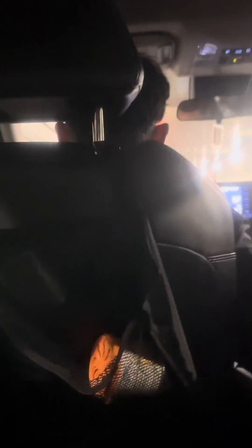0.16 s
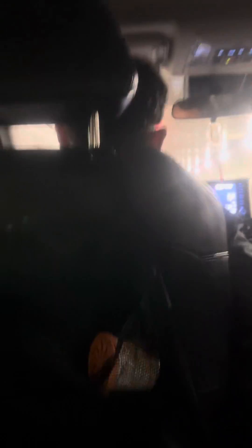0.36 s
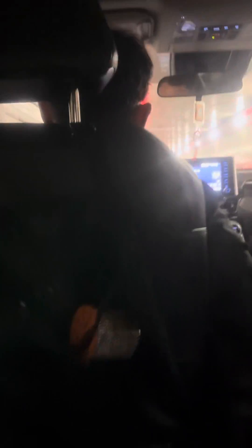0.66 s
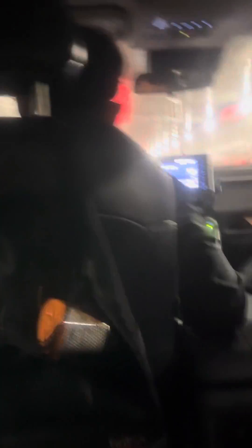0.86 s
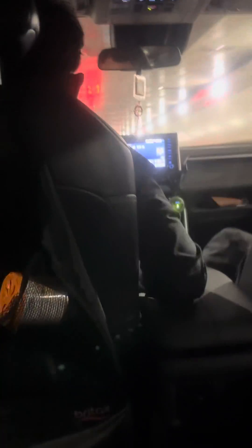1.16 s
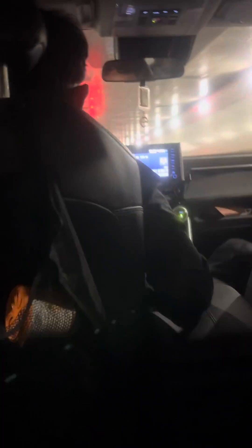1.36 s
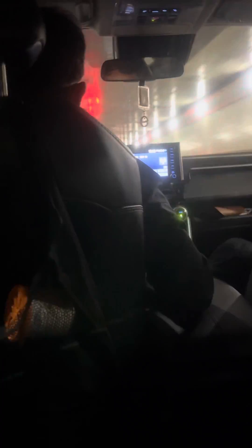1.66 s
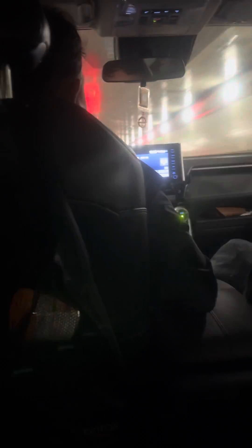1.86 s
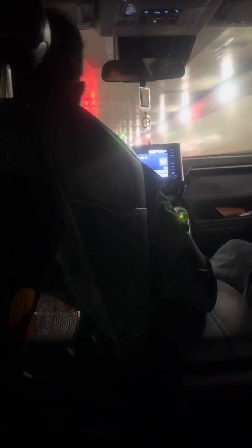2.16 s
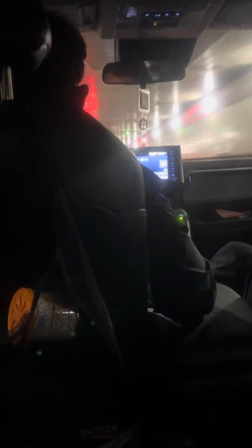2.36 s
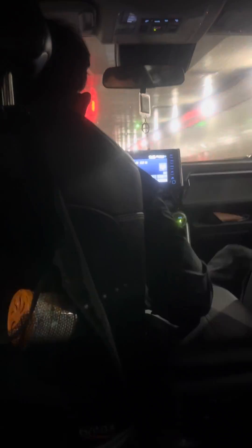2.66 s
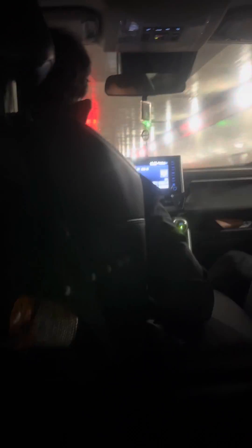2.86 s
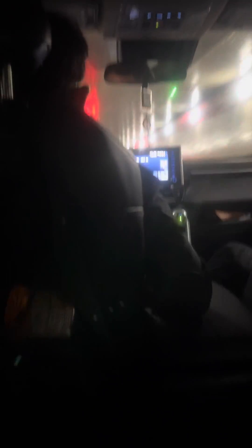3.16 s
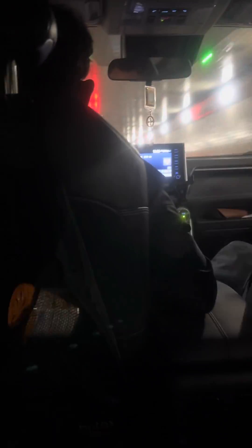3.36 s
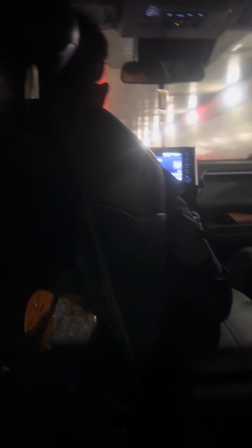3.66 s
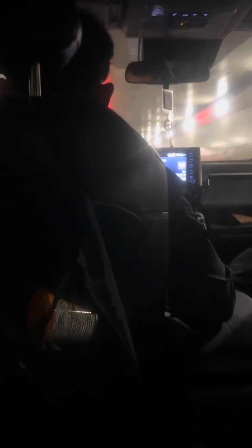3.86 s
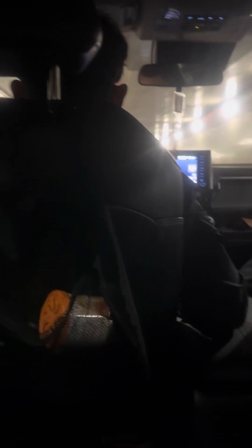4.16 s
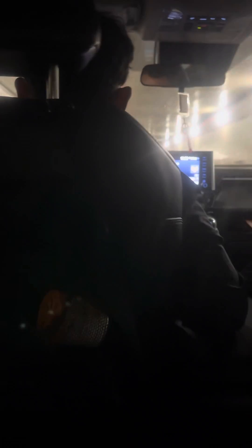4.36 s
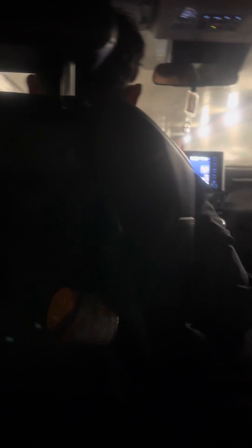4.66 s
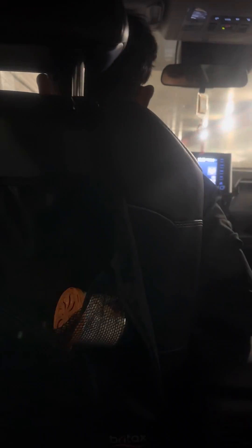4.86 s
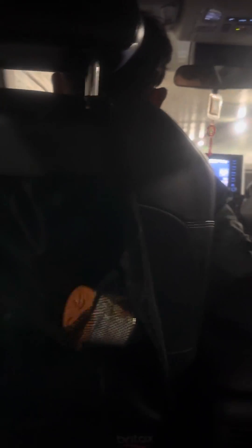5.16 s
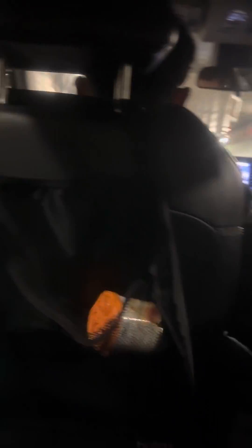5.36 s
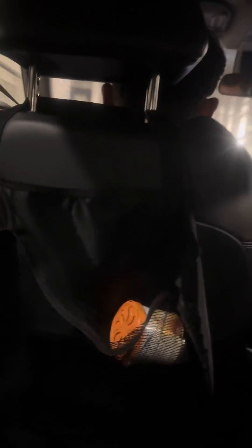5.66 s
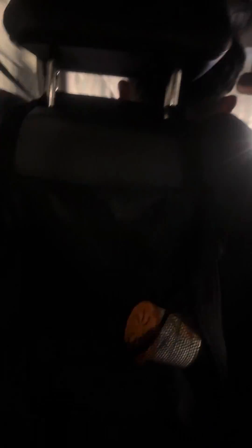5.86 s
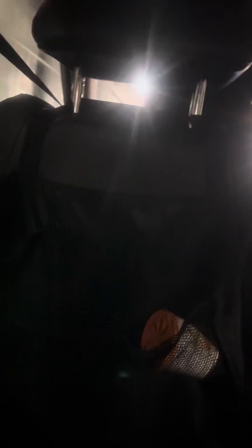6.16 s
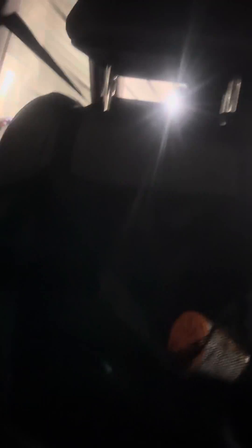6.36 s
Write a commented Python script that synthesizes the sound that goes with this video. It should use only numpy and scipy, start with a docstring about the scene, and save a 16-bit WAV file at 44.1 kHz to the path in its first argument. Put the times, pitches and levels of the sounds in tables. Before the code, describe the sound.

Heard from a car's back seat, heavy low rumble and engine hum continue, with a brief sleeve rustle, dull jolts and one plastic click.

```python
"""Inside a car driving through a tunnel, heard from the back seat.
From the start the road shakes the body into a deep rumble, tyres roar in brief swells and air hisses outside.
The engine drones, sags while coasting and later climbs under load; the wheels add a boom and a drone.
Early on a sleeve brushes the seat: shaped noise with bright ticks. Bumps then ring modes of the body,
and a piece of plastic trim clicks: a quick run of contacts that rings its own modes."""
import sys
import numpy as np
from scipy import signal
from scipy.fft import rfft, irfft
from scipy.io import wavfile
from scipy.ndimage import uniform_filter1d

SR = 44100
rng = np.random.default_rng(int(sys.argv[2]) if len(sys.argv) > 2 else 0)


def store_pcm(level_fs):
    """Save levels as 16-bit WAV."""
    pcm = np.round(np.clip(level_fs, -1, 1) * 32767).astype(np.int16)
    wavfile.write(sys.argv[1], SR, np.atleast_2d(pcm).T)


N = 287091


def from_db(db):
    """Decibels to gain."""
    return 10 ** (np.asarray(db) / 20)


def rms_one(x):
    """Scale to rms 1."""
    return x / np.sqrt(np.mean(x ** 2) + 1e-20)


def in_time(rows):
    """Each column of a curve, drawn as straight lines between its points, at every sample."""
    seconds, *columns = np.transpose(rows)
    t = np.arange(N) / SR
    return [np.interp(t, seconds, column) for column in columns]


def at_hz(points, hz):
    """Read a curve over pitch on a log-frequency axis."""
    known_hz, values = np.transpose(points)
    return np.interp(np.log(hz + 1), np.log(known_hz + 1), values)


def lift_db(resonances, hz):
    """How many dB a set of resonances lifts each frequency."""
    return sum(lift / (1 + (2 * (hz - centre) / width) ** 2) for centre, width, lift in resonances)


def drift(per_s):
    """Slow chance with spread 1: noise that loses strength above per_s wavers a second."""
    hz = np.fft.rfftfreq(N, 1 / SR)
    smooth = rfft(rng.standard_normal(N)) / (1 + (hz / per_s) ** 2)
    return rms_one(irfft(smooth, N))


def cabin_noise(spectrum, resonances=()):
    """A diffuse noise field, left and right: alike in some bands, unlike in others; their mean has rms 1."""
    # How alike both sides are. Each row: pitch in Hz, likeness from 0 to 1.
    likeness_curve = [(45, .9999), (90, .999), (140, .996), (200, .98), (290, .92), (400, .96), (500, .78),
                      (565, .86), (620, .3), (690, .45), (860, .25), (1200, .68), (1600, .93), (1900, .98),
                      (2250, .92), (2600, .56), (3000, .3), (3400, .8), (4000, .8), (4450, .68),
                      (5400, .93), (6300, .85), (8000, .85)]
    # Phase between the sides. Each row: pitch in Hz, radians by which left leads.
    lead_curve = [(600, 0), (1120, .35), (1900, .05), (4800, .2), (5300, -.18), (6000, -.5), (7000, -1.15),
                  (8000, -1.65), (9000, -2.2)]
    # Balance of the field. Each row: pitch in Hz, left minus right in dB.
    balance_curve = [(150, 0), (190, -0.5), (250, -1), (410, -1), (540, 0.5), (770, -1.5), (900, 0),
                     (3000, 0), (5500, 0)]
    hz = np.fft.rfftfreq(N, 1 / SR)
    colour_db = at_hz(spectrum, hz) + lift_db(resonances, hz)
    alike, lead = at_hz(likeness_curve, hz), at_hz(lead_curve, hz)
    mid, side = rfft(rng.standard_normal((2, N)))
    sign = np.array([[1], [-1]])  # left, right
    blend = np.sqrt(1 + alike) * mid + sign * np.sqrt(1 - alike) * side
    sides = blend * np.exp(.5j * sign * lead)
    sides /= np.sqrt(1 + alike * np.cos(lead))  # the spectrum describes the mean of both sides
    side_db = colour_db + sign * at_hz(balance_curve, hz) / 2
    pair = irfft(sides * from_db(side_db), N)
    return pair / pair.mean(axis=0).std()


def steadied(pair, window_s, share):
    """Take a share of the slow swells out of a noise; the mean of both sides keeps rms 1."""
    window = max(int(window_s * SR), 1)
    power = uniform_filter1d(np.mean(pair ** 2, axis=0), window)
    even = pair / power ** (np.clip(share, 0, 1) / 2)
    return even / even.mean(axis=0).std()


def strike(hits, modes, spread_db):
    """Every hit rings every mode as a decaying sine, each time with a slightly different strength."""
    times, hit_db = np.transpose(hits)
    chance_db = spread_db * rng.standard_normal((len(hits), len(modes)))
    strengths = from_db(hit_db[:, None] + chance_db)
    samples = np.round(times * SR).astype(int)
    ringing = np.zeros(N)
    for (hz, mode_db, t60), strength in zip(modes, strengths.T):
        taps = np.full(N, 1e-18)
        taps[samples] = strength * from_db(mode_db)
        decay = from_db(-60 / (t60 * SR))  # per sample
        turn = 2 * np.pi * hz / SR  # radians per sample
        ringing += signal.lfilter([0, np.sin(turn)], [1, -2 * decay * np.cos(turn), decay * decay], taps)
    return ringing


def drone(hz, level_db, orders, flutter_db, wobble):
    """A hum at multiples of its rate, orders = (multiple, dB); the load shakes its level and phase (radians)."""
    angle = 2 * np.pi * np.cumsum(hz) / SR + wobble * drift(2.9)
    tone = sum(from_db(db) * np.sin(k * angle + 2 * np.pi * rng.random()) for k, db in orders)
    return np.sqrt(2) * tone * from_db(level_db + flutter_db * drift(48))


def road_rumble():
    """The surface shakes the body unevenly: deep noise that gets louder with the roughness of the road."""
    # Roughness of the road. Each row: time in seconds, rumble level in dB.
    roughness = [(0, -22.5), (.36, -29), (.48, -23.5), (.74, -24), (.94, -28.5), (1.26, -25.5),
                 (1.48, -24.5), (1.6, -29), (2.2, -25.5), (2.8, -26.5), (3.15, -23), (3.32, -25),
                 (3.44, -28.5), (3.56, -25.5), (4.1, -23), (4.22, -27.5), (4.34, -23.5), (4.5, -24.5),
                 (4.7, -22), (5.04, -25.5), (5.12, -29.5), (5.25, -22), (5.48, -29), (5.7, -22.5),
                 (6.0, -21.5), (6.51, -23)]
    # Colour of the rumble. Each row: pitch in Hz, relative density in dB.
    rumble_spectrum = [(12, -46), (21, -27), (26, -11), (33, -1), (40, -3), (50, 4.5), (60, 4), (78, 8.5),
                       (105, 1.5), (135, 0), (150, -4.5), (166, -14), (210, -22), (330, -64), (9000, -120)]
    level_db, = in_time(roughness)
    return from_db(level_db) * steadied(cabin_noise(rumble_spectrum), window_s=0.11, share=0.46)


def tyres():
    """The low part of the roar follows the road surface; its upper part swells briefly now and then."""
    # Colour of the roar. Each row: pitch in Hz, relative density in dB.
    roar_spectrum = [(100, -17), (180, -0.16), (260, -3.5), (400, -5.5), (520, -8.5), (625, -13),
                     (900, -16.5), (1200, -20), (1700, -26), (2200, -29), (2600, -37.5), (3600, -63),
                     (9000, -100)]
    # Cabin air resonances that colour it. Each row: centre in Hz, width in Hz, lift in dB.
    cabin_air = [(316, 38, 2), (412, 19, 2.5), (551, 11, 4), (578, 24, 4.5), (680, 29, 3.5), (736, 22, 4),
                 (787, 33, 3), (855, 25, 3), (942, 80, 3), (1090, 63, 3), (1302, 49, 4), (1465, 39, 2.5),
                 (1620, 100, 2), (2910, 130, 8.5)]
    # Loudness of the low part. Each row: time in seconds, gain in dB.
    low_roar = [(0, -1), (.3, -1), (.48, 0), (.8, -1.5), (1.22, -1), (1.6, 0), (2.1, -1), (2.38, 2.5),
                (2.85, -1.5), (3.1, 2.7), (3.6, -1), (4.25, 0.7), (4.44, 2.4), (4.65, -1.5), (5.05, 2),
                (5.4, -1), (5.85, -0.5), (6.51, 1.3)]
    # Brief swells of the upper part. Each row: peak time in seconds, lift in dB.
    swells = [(.58, 0.5), (1.24, 0.5), (1.86, 0), (2.75, 1), (3.08, 1), (3.53, 0.5), (3.77, 0.7),
              (4.7, 0.9), (5.33, 1), (6.24, 1.5)]
    roar_db, split_hz = -32.5, 380
    swell_s = .09  # from the peak to 1/e of the lift
    roar = from_db(roar_db) * steadied(cabin_noise(roar_spectrum, cabin_air), window_s=0.57, share=0.21)
    t = np.arange(N) / SR
    low_db, = in_time(low_roar)
    swell_db = sum(db * np.exp(-((t - s) / swell_s) ** 2) for s, db in swells)
    split = signal.butter(2, split_hz, "high", fs=SR, output="sos")
    upper = signal.sosfiltfilt(split, roar)
    low = roar - upper
    return low * from_db(low_db) + upper * from_db(swell_db)


def air():
    """Steady hiss leaks in through doors and glass, with a faint narrow hiss as of air at a door seal."""
    # Colour of the steady hiss. Each row: pitch in Hz, relative density in dB.
    hiss_spectrum = [(1500, -9), (2600, 0.5), (3100, -3), (3400, -1.5), (3900, -3), (4400, -2),
                     (4700, -1.5), (5700, -0.5), (6300, -5.5), (7300, -8.5), (8000, -18.5), (8600, -30.5),
                     (9700, -25.5), (10800, -54.5)]
    # Loudness of the narrow hiss. Each row: time in seconds, level in dB.
    seal_level = [(0, -70), (.65, -73), (.95, -63), (1.5, -65), (1.75, -63), (2.3, -68), (2.8, -67),
                  (3.15, -62.5), (3.55, -66), (3.8, -71), (5.1, -71), (5.7, -65), (6.51, -66)]
    # Colour of the narrow hiss. Each row: pitch in Hz, relative density in dB.
    seal_spectrum = [(2400, -24), (3000, -6), (3450, 0), (3800, -3), (4600, -24), (9000, -60)]
    hiss_db, flutter_db = -56.5, 1
    hiss = from_db(hiss_db) * cabin_noise(hiss_spectrum)
    seal_db, = in_time(seal_level)
    waver_db = flutter_db * drift(9)  # the leak wavers with the air flow
    return hiss + from_db(seal_db + waver_db) * cabin_noise(seal_spectrum)


def engine():
    """The firing note with its half and double: waves so long that both sides hear the same."""
    # It sags while coasting, then climbs under load. Each row: time in seconds, firing note in Hz, level in dB.
    firing = [(0, 97, -23.5), (.33, 95.5, -37.5), (.47, 94.94, -30.5), (.56, 89.4, -35), (.68, 85.3, -15),
              (.88, 79.6, -40), (1.03, 78.7, -29), (1.2, 76.94, -23.5), (1.6, 80, -32.5), (1.95, 78.7, -26),
              (2.35, 79.03, -32.5), (2.55, 81, -31), (2.95, 82.2, -24.5), (3.47, 74.9, -48),
              (3.7, 72.6, -20), (3.95, 72.27, -24), (4.2, 72.8, -27), (4.55, 75.5, -25.5),
              (4.72, 80.47, -22), (4.97, 88.36, -21.5), (5.12, 92.63, -37), (5.24, 95.47, -20.5),
              (5.4, 97.24, -24.5), (5.58, 100.1, -17), (5.72, 98.4, -32.5), (6.25, 95.3, -29),
              (6.42, 95.8, -18), (6.51, 96.2, -24)]
    hz, level_db = in_time(firing)
    engine_orders = [(1 / 2, -13), (1, -.7), (2, -24)]
    return drone(hz, level_db, engine_orders, flutter_db=2.0, wobble=.3)


def wheels():
    """A low boom and a higher drone follow the wheel speed and swell near the resonances of the shell."""
    # The rolling wheels. Each row: time in seconds, turns per second, boom level in dB, drone level in dB.
    rolling = [(0, 8.9, -31.5, -42.5), (1.15, 9.1, -36, -41), (1.36, 9.3, -29.5, -31.5),
               (1.65, 9.25, -30.5, -35.5), (1.9, 9.2, -31, -31), (2.25, 9.25, -31, -31),
               (2.4, 9.3, -35, -35), (2.85, 9.35, -29, -34.5), (3.15, 9.7, -29.5, -29.5),
               (3.4, 10.1, -35.5, -33), (3.6, 10.4, -37, -37), (4.95, 10, -48, -43.5),
               (5.3, 10.1, -33, -33.5), (5.65, 10.1, -36.5, -32), (5.95, 10.1, -30, -37),
               (6.25, 10.1, -36, -32), (6.51, 10, -38, -39)]
    # Harmonics of the wheel turn that reach the cabin: multiple for the boom, multiple for the drone.
    multiples = (4.9, 11.76)
    # Body shell resonances. Each row: centre in Hz, width in Hz, lift in dB.
    shell = [(51, 4.1, 6.5), (109.3, 16, 4)]
    turns_per_s, *levels_db = in_time(rolling)
    hum = np.zeros(N)
    for multiple, level_db in zip(multiples, levels_db):
        hz = multiple * turns_per_s
        hum += drone(hz, level_db + lift_db(shell, hz), [(1, 0.0023)], flutter_db=2.5, wobble=0.41)
    return hum


def sleeve():
    """Strokes over the seat swell and die away in grainy scrapes; folds snag and let go with brighter ticks."""
    # Strokes. Each row: peak time in seconds, level in dB, seconds to rise by 60 dB, seconds to fall by 60 dB.
    strokes = [(.848, -63, .1, .1), (.958, -52.5, .12, .2), (.998, -56, .09, .22), (1.042, -52, .04, .24),
               (1.203, -60, .06, .15)]
    # Colour of the cloth. Each row: pitch in Hz, relative density in dB.
    cloth_spectrum = [(1500, -16), (3200, -9), (4200, -9), (5200, 1), (6300, -3), (7300, -5), (8500, -11),
                      (9600, -12), (11300, -21), (12700, -35), (15000, -33)]
    # Snagging folds. Each row: start in seconds, level in dB.
    ticks = [(.605, -60), (.8365, -50.5), (.942, -54), (.947, -53)]
    # Colour of a tick. Each row: pitch in Hz, relative density in dB.
    tick_spectrum = [(2500, -14), (6000, 0), (9000, -3), (11000, -15), (15000, -17)]
    tick_s = .001  # a tick fades to 1/e in this time
    t, pressure = np.arange(N) / SR, np.zeros(N)
    for peak_s, peak_db, rise_s, fall_s in strokes:
        away = np.maximum((t - peak_s) / fall_s, (peak_s - t) / rise_s)
        pressure += from_db(peak_db - 60 * np.minimum(away, 2))
    grain_db = 3 * drift(300) + 1.2 * drift(60)
    snags = np.zeros(N)
    for start_s, db in ticks:
        fade = np.exp(-np.minimum(np.abs(t - start_s) / tick_s, 20))
        snags += from_db(db) * (t >= start_s) * fade
    scrapes = pressure * from_db(grain_db) * cabin_noise(cloth_spectrum)
    return scrapes + snags * cabin_noise(tick_spectrum)


def bumps():
    """Bumps in the road ring the modes of the body; the tyres cushion them, so little treble gets through."""
    # Bumps. Each row: time in seconds, strength in dB.
    jolts = [(1.435, -21), (2.235, -23.5), (2.51, -20), (4.645, -18.5), (5.585, -21), (5.925, -21)]
    # Body modes. Each row: pitch in Hz, strength in dB, seconds to die away by 60 dB.
    body_modes = [(52.5, -4, 0.13), (88.7, 0, 1), (102.2, -0.5, 0.39), (129, -17.5, 0.2)]
    cushion = signal.butter(2, 170, fs=SR, output="sos")  # low-pass, Hz
    return signal.sosfilt(cushion, strike(jolts, body_modes, spread_db=1.5))


def trim():
    """Plastic snaps with a slightly soft contact; nearby surfaces scatter the click differently to each side."""
    # A quick run of contacts. Each row: time in seconds, strength in dB.
    contacts = [(1.8464, -42), (1.8485, -46), (1.8502, -40), (1.8525, -44), (1.8546, -45), (1.8574, -51)]
    # Modes of the trim. Each row: pitch in Hz, strength in dB, seconds to die away by 60 dB.
    trim_modes = [(410, 11, .018), (620, 7, .014), (1030, 5, .016), (1443, 5, .034), (1800, 0, .01),
                  (2290, -1, .018), (2600, -5.5, .014), (2850, -6.5, .014), (3400, -14, .007),
                  (4680, -4, .016), (4860, -5, .013), (5120, -3, .016), (5480, -4, .012), (5990, -10, .008),
                  (6535, -12, .008), (7300, -11, .006)]
    softness = signal.butter(5, 5900, fs=SR, output="sos")  # low-pass, Hz
    click = signal.sosfilt(softness, strike(contacts, trim_modes, spread_db=1.5))
    t = np.arange(SR // 10) / SR
    echoes = rng.standard_normal((2, len(t))) * np.exp(-t / 0.017)
    echoes /= np.linalg.norm(echoes, axis=1, keepdims=True)
    scattered = signal.fftconvolve(click[None], echoes)[:, :N]
    return click + from_db(-6) * scattered


def scene():
    """Everything that reaches the back seat."""
    ride = road_rumble() + tyres() + air() + engine() + wheels()
    return ride + sleeve() + bumps() + trim()


def record(dry):
    """The sound eases in and out over a few milliseconds; the deepest bass is thinned, the top cut steeply."""
    low_cut_hz, cutoff_hz, ease_s = 24, 15140, .003
    to_nearest_end = np.minimum(np.arange(N), np.arange(N)[::-1])  # samples
    ease = np.clip(to_nearest_end / (ease_s * SR), 0, 1)
    thinned = signal.sosfilt(signal.butter(2, low_cut_hz, "high", fs=SR, output="sos"), dry * ease)
    return signal.sosfilt(signal.butter(10, cutoff_hz, fs=SR, output="sos"), thinned)


dry = scene()
out = record(dry)
store_pcm(out)
```